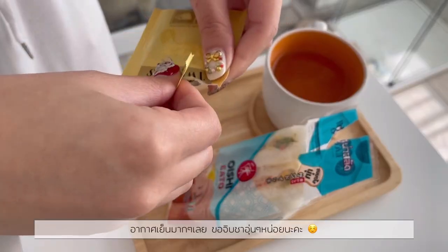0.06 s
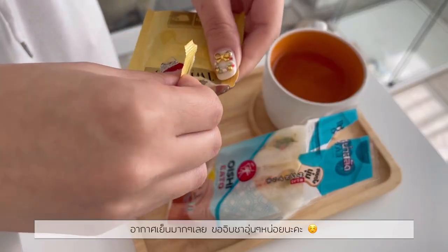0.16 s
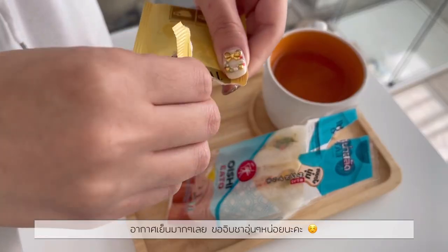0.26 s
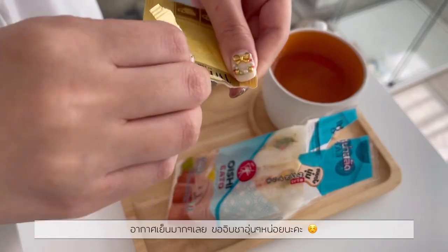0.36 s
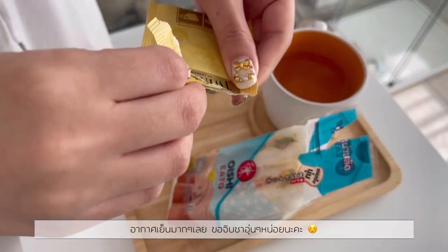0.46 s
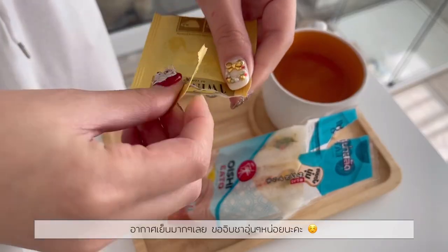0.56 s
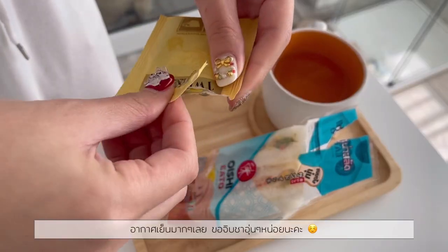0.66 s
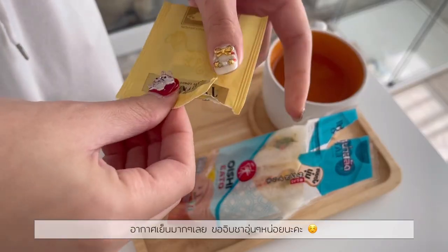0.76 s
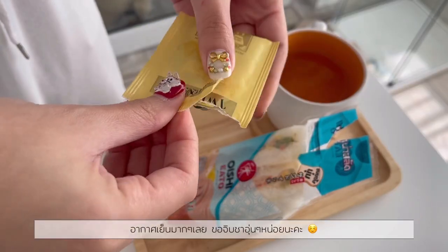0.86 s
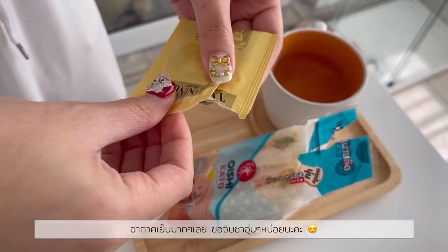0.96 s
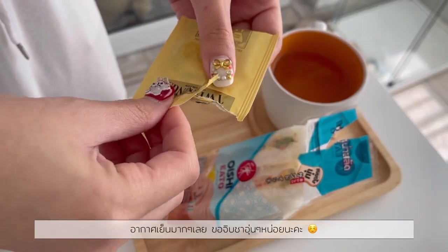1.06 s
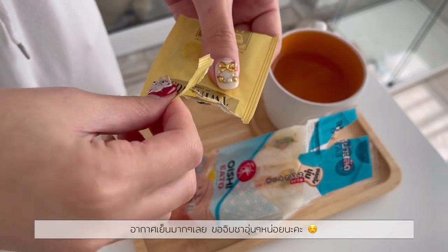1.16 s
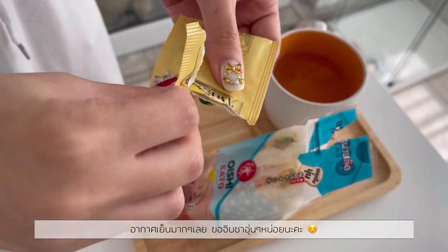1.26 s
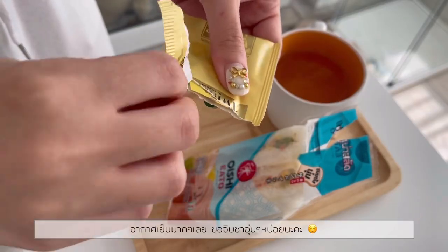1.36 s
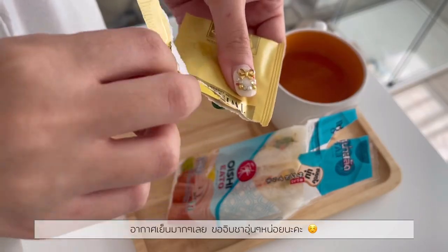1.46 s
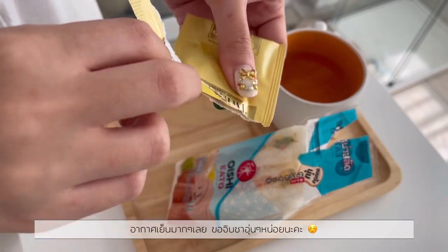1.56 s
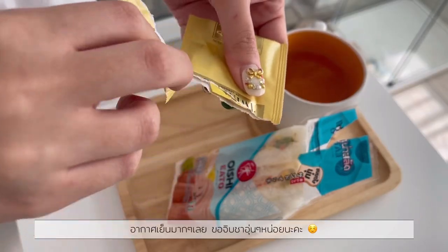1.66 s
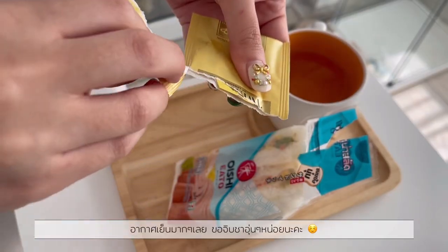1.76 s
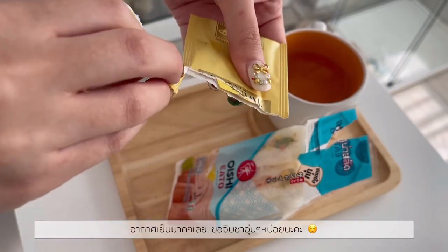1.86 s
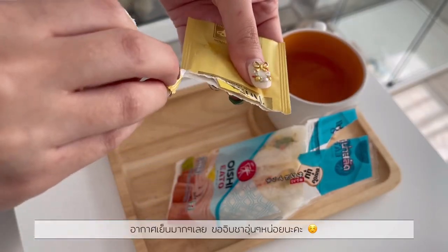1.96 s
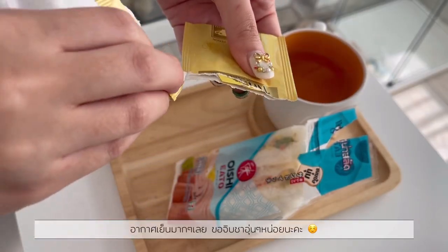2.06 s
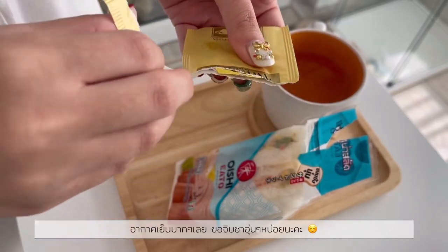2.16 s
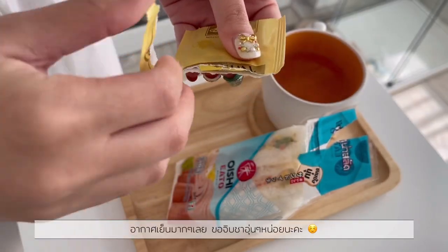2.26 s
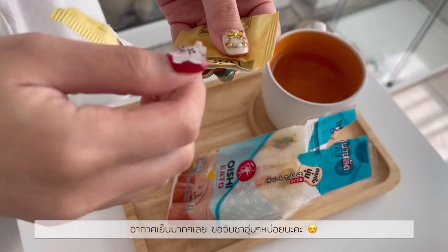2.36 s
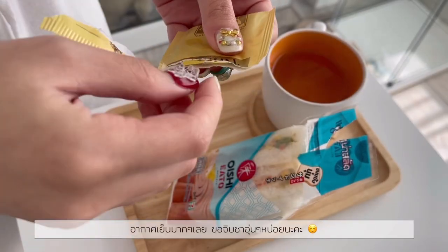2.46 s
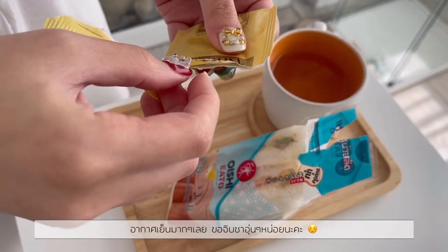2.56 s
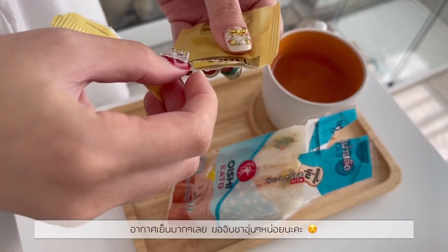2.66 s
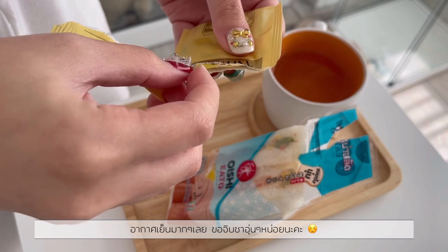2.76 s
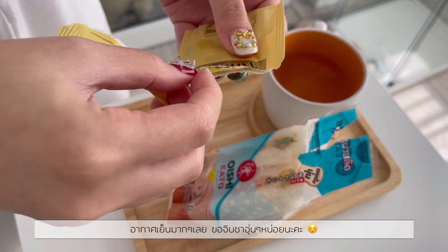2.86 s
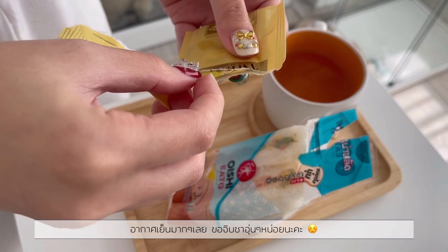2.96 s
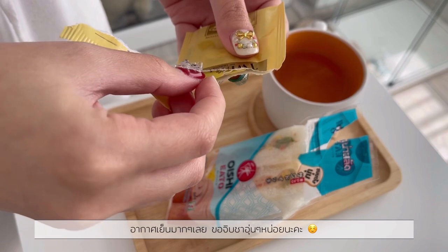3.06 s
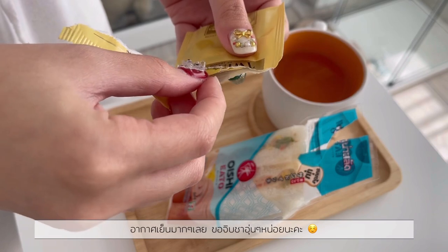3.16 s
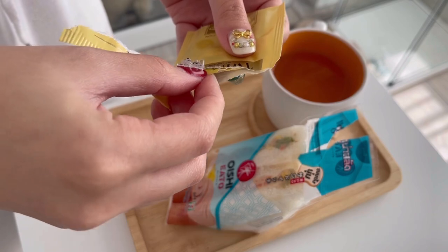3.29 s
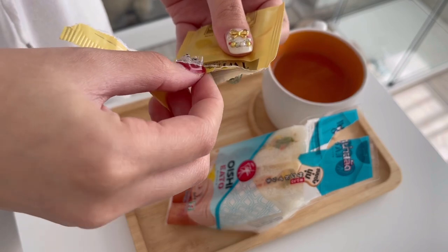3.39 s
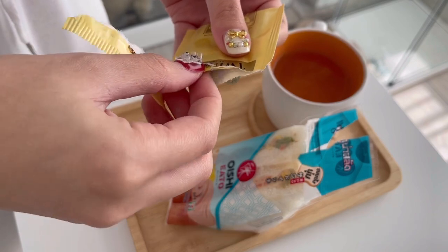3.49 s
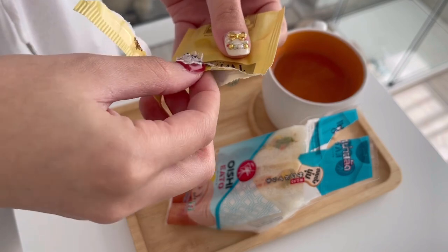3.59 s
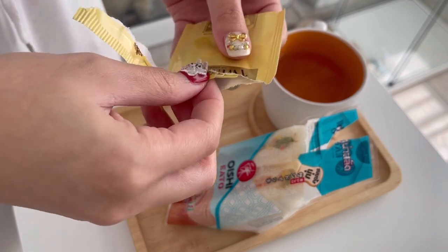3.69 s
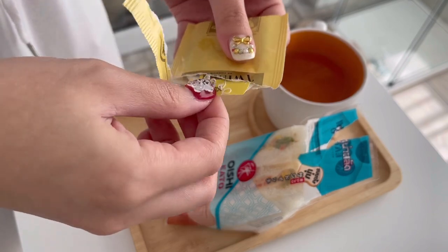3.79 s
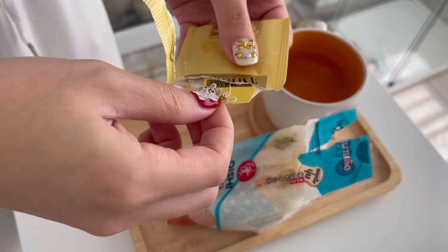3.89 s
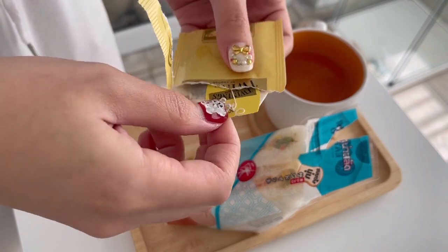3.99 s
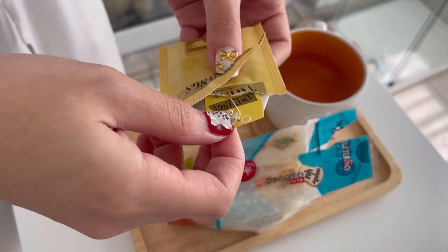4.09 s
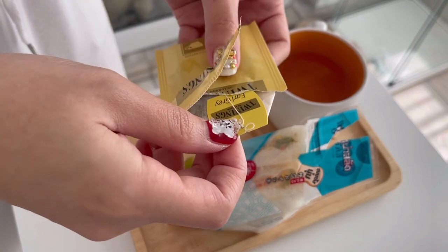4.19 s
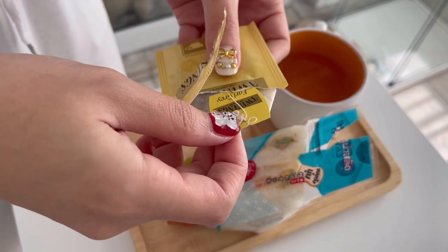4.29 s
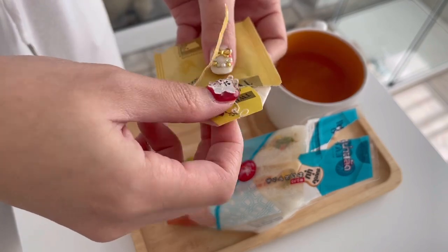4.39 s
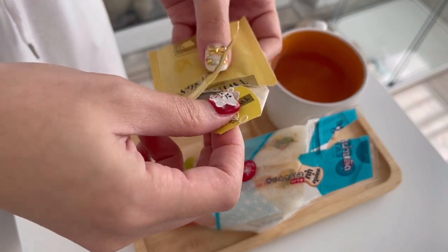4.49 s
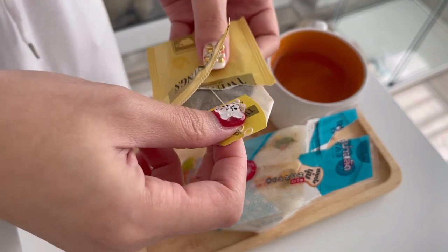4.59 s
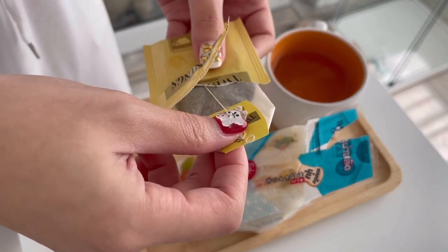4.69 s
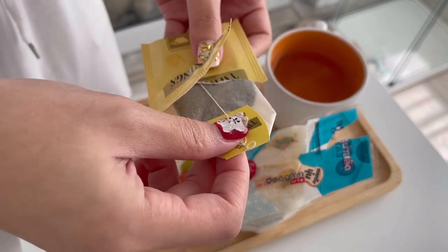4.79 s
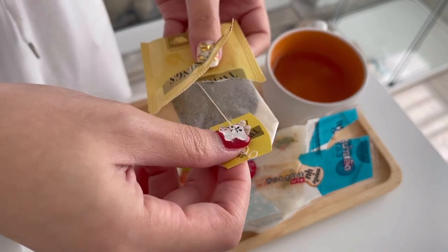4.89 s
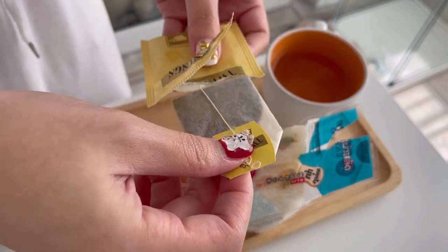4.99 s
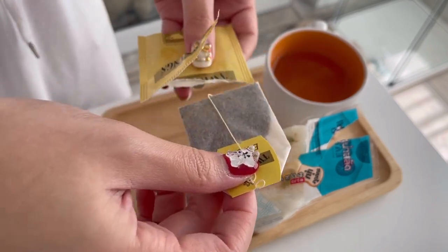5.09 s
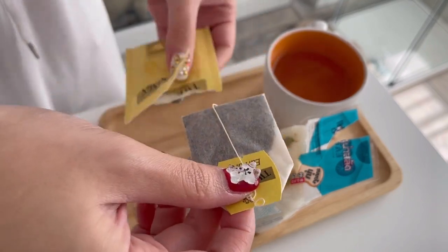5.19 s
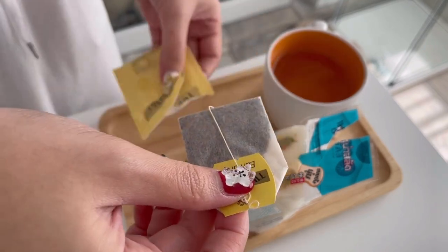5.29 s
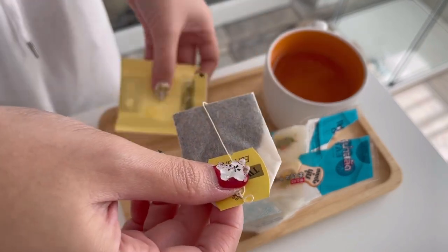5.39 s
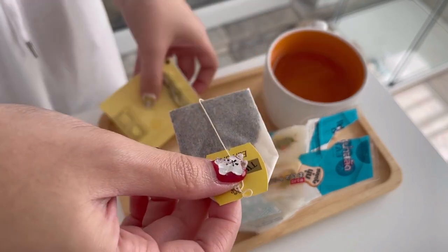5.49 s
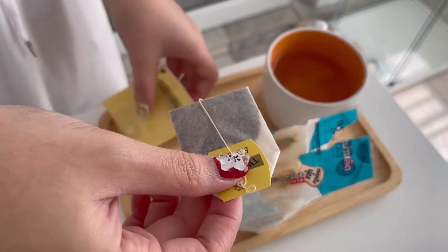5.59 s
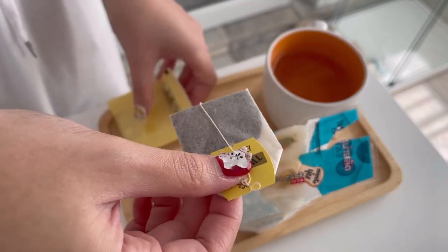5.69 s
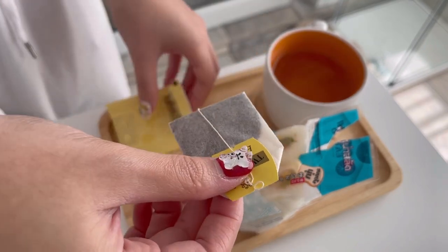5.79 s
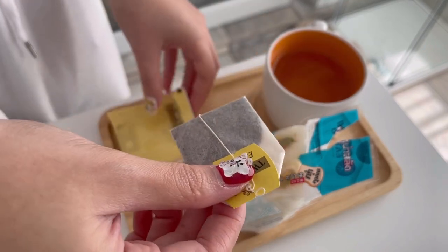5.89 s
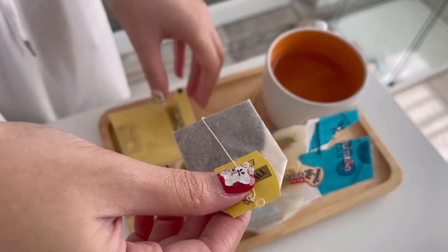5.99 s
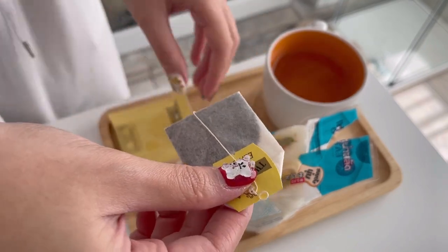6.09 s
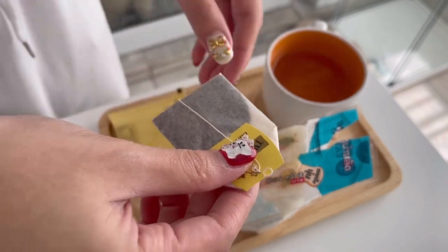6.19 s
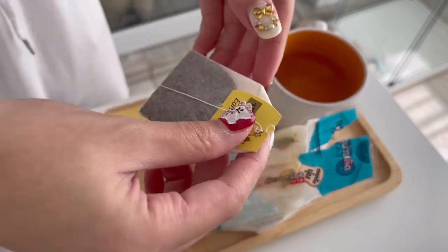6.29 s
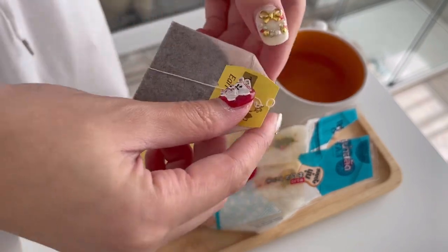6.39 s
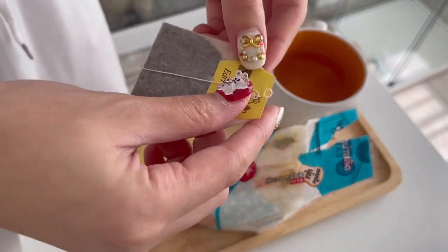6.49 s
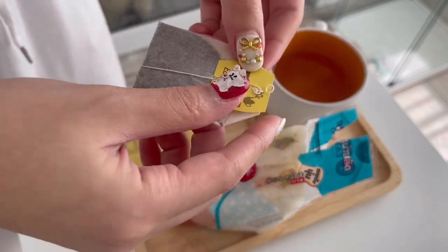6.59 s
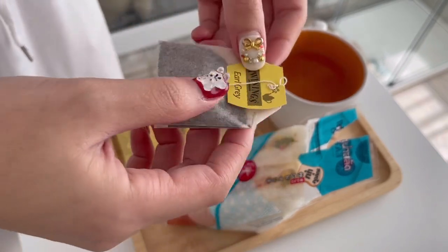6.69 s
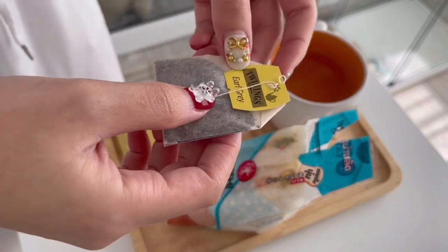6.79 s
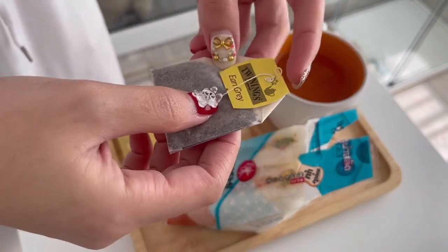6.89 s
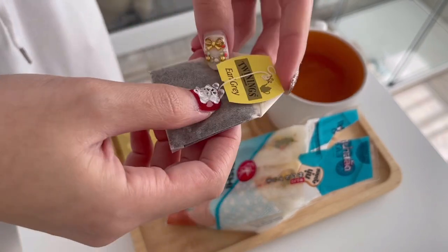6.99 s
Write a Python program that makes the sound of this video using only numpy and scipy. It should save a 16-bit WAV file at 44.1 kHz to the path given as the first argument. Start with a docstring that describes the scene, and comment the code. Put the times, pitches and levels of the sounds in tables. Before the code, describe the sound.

Close to the microphone, fingers tear and crinkle a paper tea-bag sachet over a wooden tray. Crisp snaps and hissy rips come thickly at first, thin out, then return as the tea bag slides out with a papery rub. A few dull thuds come through the table as the wrapper is set down, and the handling ends in faint rustles. A quiet room hums steadily behind it.

```python
"""A humming room, close to a two-port phone microphone: fingers tear, rub and crinkle a paper sachet
over a wooden tray. Slipping fibres hiss and crackle, creases buckle with a snap that the tray reflects,
and the paper resonates in grainy bands. Dull thuds and a low shaking come through the table.
Far off, an insect chirps twice."""
import sys
import numpy as np
from scipy import signal
from scipy.fft import rfft, irfft, next_fast_len
from scipy.io import wavfile
from scipy.ndimage import uniform_filter1d

SR = 44100
rng = np.random.default_rng(int(sys.argv[2]) if len(sys.argv) > 2 else 0)


def transcribe(signal):
    """Save signal, clipped to [-1, 1], as a 16-bit WAV file at the path in sys.argv[1]."""
    frames = np.atleast_2d(signal).T
    limited = np.clip(frames, -1, 1)
    pcm = np.round(limited * 32767).astype(np.int16)
    wavfile.write(sys.argv[1], SR, pcm)


N = 310905

# room air spectrum (frequency [Hz], relative level [dB])
AIR_SPECTRUM = [(18, -13), (30, -15.5), (71, -3), (145, -5), (202, -1), (319, -4), (432, -12), (756, -17),
                (858, -20), (1160, -23), (4360, -51.5), (7820, -49), (11200, -49.5), (13000, -71.5)]
# left-right likeness of the air (frequency [Hz], correlation [-], sign ignored)
AIR_COHERENCE = [(60, -0.4), (180, 1), (550, 0.31), (1650, 0.42), (4970, 0.66), (15000, -0.41)]
# hum bands (centre [Hz], width [Hz], level [dB])
HUM_BANDS = [(192, 6.8, -58), (270, 13, -65.5), (311.3, 7.3, -65)]
# slow level of the table's shaking (time [s], level [dB])
SHAKE_LEVEL = [(0, -47), (.24, -39.5), (.3, -50.5), (.78, -44.5), (.9, -56.5), (1.22, -59), (1.3, -42.5),
               (1.7, -49.5), (1.8, -60.5), (2.65, -60), (2.9, -50), (3.6, -52), (4.4, -74), (4.7, -44.5),
               (5.05, -51.5), (5.45, -60.5), (5.55, -32.5), (5.9, -48), (6.05, -52), (6.25, -43.5),
               (7.05, -44)]
# spectrum of the shaking (frequency [Hz], relative level [dB])
SHAKE_SPECTRUM = [(15, -49.5), (28, -33), (38, -6.5), (48, 2), (65, 1.5), (108, -5.5), (156, -12.5),
                  (296, -26), (400, -32.5), (520, -42), (880, -120)]
# thuds through the table (time [s], level [dB], pitch [Hz])
THUDS = [(0.0, -22, 101), (0.78, -18.5, 83.3), (0.826, -33, 80), (1.37, -26, 67.2), (1.448, -18.5, 103.5),
         (1.461, -21.5, 152.8), (1.466, -29.5, 201), (1.593, -22, 84.3), (1.69, -36, 94.7),
         (1.95, -39, 55.3), (2.002, -31.5, 198), (2.16, -41, 70.2), (2.974, -30.5, 116.8),
         (3.096, -20.5, 100.8), (3.432, -33.5, 117.6), (3.877, -28.5, 101.4), (4.706, -26.5, 58),
         (4.76, -29, 80), (4.811, -26.5, 69.2), (5.192, -33.5, 68.2), (5.503, -17, 85.5),
         (5.541, -26.5, 68.2), (5.577, -17.5, 57.4), (5.72, -33.5, 72.9), (5.879, -29, 70.6),
         (6.322, -23, 72.5), (6.545, -23.5, 64.1), (6.593, -30, 90), (6.618, -25.5, 93.6),
         (6.715, -39, 65.9)]
# finger strokes (start [s], length [s], first [dB], last [dB], relative body [dB], crackle share [0-1])
STROKES = [(0.0, 0.059, -49, -59, -4.5, 0), (0.102, 0.11, -48.5, -46, -15, 0.7),
           (0.254, 0.12, -36.5, -38, -14.5, 0.25), (0.507, 0.057, -49, -60, -3.5, 0.6),
           (0.584, 0.15, -73, -53.5, -3.5, 0.76), (0.826, 0.13, -65, -52.5, -7.5, 0.4),
           (1.172, 0.088, -59, -50, -16, 0.5), (1.279, 0.175, -44, -35.5, -12.5, 0.14),
           (1.527, 0.056, -46, -38, -15, 0.35), (1.613, 0.045, -38.5, -32, -13.5, 0),
           (1.66, 0.03, -35, -40.5, -12, 0.3), (1.782, 0.1, -54.5, -46, -12, 0.7),
           (2.111, 0.23, -58.5, -63.5, -7.5, 0.34), (2.527, 0.083, -71.5, -60.5, -7.5, 0.64),
           (3.13, 0.18, -78, -80, -7, 0.35), (3.381, 0.11, -65.5, -50, -9, 0.4),
           (3.666, 0.096, -53, -37.5, -18.5, 0.2), (3.773, 0.18, -47, -46, -14.5, 0.1),
           (3.955, 0.1, -55, -52, -13.5, 0.4), (4.095, 0.065, -43, -42.5, -17, 0.2),
           (4.27, 0.15, -62.5, -63.5, -6.5, 0.57), (4.458, 0.135, -42, -42, -19.5, .1),
           (4.609, 0.26, -42, -49.5, -19, 0.05), (4.855, 0.15, -53.5, -52.5, -11, 0.1),
           (5.232, 0.044, -59, -64.5, -3, 0.7), (5.357, 0.053, -67, -55, -10.5, 0.4),
           (5.498, 0.18, -75, -60, -9.5, 0.2), (5.66, .06, -70, -66, 2, .3),
           (5.737, 0.14, -50, -62, -4, 0.5), (5.915, 0.02, -49.5, -54, 0, 0.68),
           (6.211, 0.31, -90, -83.5, 8.5, 0.6), (6.697, 0.11, -79, -62, -1.5, 0.5),
           (6.784, 0.41, -75, -67, 0, 0.34)]
# fingertip brushes (start [s], length [s], level [dB], relative body [dB])
BRUSHES = [(0.584, .012, -47, -9), (2.869, 0.015, -60.5, -11.5), (3.024, 0.021, -68.5, -7),
           (3.458, 0.0073, -38.5, -13.5), (5.177, 0.011, -55, -14), (5.515, 0.01, -50, -25),
           (5.544, 0.027, -51, -17), (6.327, .012, -54.5, -2.5)]
# paper treble (frequency [Hz], relative level [dB])
CRACK_SPECTRUM = [(3000, -20), (4100, -11), (5900, -8), (6900, -7.5), (7600, -1.5), (8800, -0.5),
                  (9600, 3.5), (10400, -1.5), (11100, 2), (11800, -9), (12500, -14.5), (13200, -21.5),
                  (14000, -26.5), (15500, -32.5)]
# flexing sheet (frequency [Hz], relative level [dB])
BODY_SPECTRUM = [(300, 2.5), (600, 0.5), (900, 0), (1500, 0), (2800, -1), (3600, -7), (5000, -14)]
# off-centre rustle, before stereo width (frequency [Hz], left-right [dB])
RUSTLE_PAN = [(60, 4.5), (150, -2.5), (380, 2), (950, 1.5), (2380, 4), (5300, 5), (6200, 0.5),
              (15000, -0.5)]
# top treble, dulling as the sachet turns and is laid down (time [s], gain [dB])
TREBLE_GAIN = [(0, -1.5), (.3, -1.4), (.9, -2), (1.3, 4.5), (1.53, 5), (1.7, 0.5), (2.2, 3), (2.7, -10),
               (3.1, -3), (3.5, -0.5), (4.2, -2.1), (4.9, -3), (5.25, 0), (5.45, -5.5), (5.9, -7),
               (6.3, -4), (7.05, -2)]
# room decay (frequency [Hz], T60 [s])
ROOM_T60 = [(800, 0.31), (3000, 0.35), (9000, 0.29), (14000, 0.15)]
# creases, before stereo width (time [s], level [dB], relative body [dB], ring [Hz], left-right [dB])
SNAPS = [(0.0925, -31.5, -13, 3440, 5), (0.2543, -35, -10, 3005, 2.5), (.289, -26, -8, 1983, 4),
         (0.3135, -23, -22, 3004, -2), (0.3596, -21, -21, 3120, 9), (0.371, -23, -16, 2440, 3),
         (.396, -20, -17, 3430, 5), (.462, -45, 5, 1980, 3), (.4635, -56, 10, 800, 3),
         (0.484, -35, -5, 2200, 4.5), (0.4994, -21.5, -6.5, 1380, 4), (0.524, -36.5, -11, 1990, 2.5),
         (.59, -48, 3, 2600, 4), (0.6176, -39.5, -6, 3390, 2), (0.63, -54, 3, 1500, 4),
         (0.6401, -16.5, -10, 1671, 5), (0.893, -51, 4.5, 2280, 9), (0.966, -28, -28, 2595, 6.5),
         (0.9997, -9.5, -22, 3340, 5.5), (1.009, -33, -15.5, 3010, 3), (1.019, -34, -4.5, 2200, 4.5),
         (1.036, -44, 1, 1500, 4), (1.0499, -12.5, -13, 2370, -2), (1.0567, -17.5, -9.5, 2520, 9),
         (1.105, -30, -13, 2620, 4), (1.171, -38.5, -5, 3200, 5), (1.199, -34.5, -12.5, 3220, 2.5),
         (1.214, -36, -23.5, 1200, 2), (1.223, -30, -14, 2790, 5.5), (1.2739, -21, -19, 1590, 3),
         (1.3, -28, -9, 3500, 4), (1.316, -26, -5, 3800, 4), (1.3214, -12.5, -18.5, 3150, 8),
         (1.375, -30, -12, 4800, 3), (1.397, -30, -11, 2700, 2.5), (1.411, -27, -8, 4100, 5),
         (1.448, -20, -13, 1990, 3), (1.466, -19, -11, 2800, 7), (1.4675, -40, 10, 450, 3),
         (1.503, -30, -24, 2410, 7.5), (1.5285, -30, -20, 2500, 4), (1.557, -27, -22, 3017, 2),
         (1.581, -27, -11, 3000, 4), (1.611, -29, -11, 2020, -1), (1.633, -19.5, -15, 2250, 0),
         (1.697, -27, -9, 4500, 10), (1.717, -28, -22, 2480, 6), (1.801, -42, -23.5, 3000, 4),
         (1.8212, -37, -25, 1350, 12), (1.848, -28, -24, 1242, 6.5), (1.8726, -26.5, -27, 2570, 11.5),
         (1.887, -32, -25, 2504, 3.5), (1.9, -25, -23.5, 2490, 5), (1.915, -27, -22, 2503, 0.5),
         (2.1262, -35.5, -6.5, 2500, 4.5), (2.28, -41, -5, 2830, 5.5), (2.3335, -46, 1, 1000, 3),
         (2.384, -19, -14.5, 3830, 4), (2.476, -51, -24, 2980, 4), (2.564, -64, -14, 3000, 2),
         (2.5813, -45.5, -5.5, 1176, -0.5), (2.6525, -28.5, -9.5, 3970, 3), (2.9849, -47.5, -12.5, 1182, 4),
         (3.0857, -24, -11, 3200, 5.5), (3.087, -50, 10, 750, 4), (3.3794, -43, -24, 2340, -1),
         (3.499, -21, -27, 2727, 3), (3.6245, -41.5, -16, 1050, 5), (3.934, -12, -20, 2600, 2.5),
         (3.9355, -44, 8, 900, 3), (4.047, -43, -2, 4000, 4), (4.1005, -29.5, -7, 1402, 3),
         (4.351, -62, -12, 1170, 3), (4.3973, -35, -11.5, 2300, 4), (4.452, -41, -6, 2705, 2),
         (4.5708, -34, -4, 3600, 6), (4.572, -46, 6, 1200, 5), (4.8171, -13.5, -12.5, 2050, 4),
         (4.8258, -22.5, -7.5, 2600, 3.5), (4.9796, -48, 8, 1930, 5), (5.008, -42, -4.5, 2800, 2),
         (5.017, -44, -10, 2850, 4), (5.043, -55, 8, 1290, 3), (5.1403, -66, 3, 3970, 4.5),
         (5.2253, -36.5, 0.5, 4400, 5.5), (5.2265, -56, 10, 1400, 5), (5.283, -61, 10, 2510, 3.5),
         (5.42, -60, -2, 4030, 2), (5.4555, -55, -9.5, 4000, 2), (5.4835, -49, -9, 2930, 5),
         (5.635, -33, -12, 1260, 1.5), (5.654, -46, 2, 3000, 6), (5.7332, -17.5, -9, 2900, 6),
         (5.734, -27, -9, 1085, 2.5), (5.831, -46, 0, 2800, 4), (5.854, -50, 0, 2800, 6),
         (5.879, -48, 2, 2800, 5.5), (5.908, -25.5, -8.5, 3300, 8.5), (5.9095, -44, 8, 1300, 6),
         (5.935, -43.5, -9.5, 3360, 2.5), (5.945, -36, -5.5, 3040, 10), (6.19, -63.5, -5, 4200, 4),
         (6.269, -70, 7.5, 3500, 5.5), (6.318, -57, -1, 3500, 2.5), (6.3664, -37, -24.5, 1103, 6),
         (6.4753, -58.5, -3, 3800, 5), (6.4937, -62, 3, 2500, 2), (6.507, -62.5, -2, 3500, 1),
         (6.7721, -54.5, 0, 3040, 3), (6.784, -48, -6, 3000, 6), (6.8042, -51, -8, 2422, 1),
         (6.824, -44, -7, 3040, 6), (6.8748, -61, -11, 2500, 2), (6.9617, -39, -6, 2350, 6),
         (7.041, -52, 0, 2500, 5)]
# resonant bands of the paper (start [s], length [s], centre [Hz], width [Hz], level [dB])
PAPER_BANDS = [(.252, .15, 1300, 1500, -54), (0.661, 0.028, 1570, 400, -55.5),
               (1.292, 0.061, 2600, 1500, -49), (1.331, 0.15, 3890, 1200, -48.5),
               (1.555, .045, 900, 700, -56), (1.655, .055, 700, 700, -52),
               (1.619, 0.076, 3950, 1200, -53.5), (3.694, 0.13, 3250, 2000, -54.5),
               (4.112, 0.088, 2800, 1500, -60.5), (4.451, 0.13, 2580, 1000, -57.5),
               (4.455, .2, 1500, 900, -63), (4.469, 0.32, 5300, 900, -57.5), (4.443, 0.5, 2760, 600, -68.5),
               (5.224, 0.049, 4640, 1200, -61), (5.626, 0.047, 1260, 400, -59),
               (5.769, 0.038, 2665, 600, -52), (5.845, 0.034, 2740, 900, -60)]
# insect chirps (start [s], length [s], centre [Hz], level [dB])
CHIRPS = [(3.175, 0.18, 6200, -79.5), (6.126, 0.17, 6200, -79.5)]
# phase between the microphone ports (frequency [Hz], left lead [rad])
PORT_PHASE = [(0, -1), (950, 0.68), (2700, 0.95), (3400, .55), (5500, .05), (6700, .05), (7500, .7),
              (8200, .45), (8900, -.8), (9600, -2.4), (10300, -3.2), (11000, -4.4), (11700, -5.7),
              (12400, -6.4), (13000, -7.6), (13700, -9.4), (14400, -12), (15100, -12.5), (16500, -12.5)]


def gain_of(db):
    return 10 ** (np.asarray(db) / 20)


def pan_gains(pan_db):
    return gain_of(np.outer([.5, -.5], pan_db))


def unit_rms(x):
    return x / np.sqrt(np.mean(x ** 2) + 1e-20)


def at_hz(points, hz):
    f, value = np.transpose(points)
    return np.interp(np.log(hz + 1), np.log(f + 1), value)


def over_time(points):
    return np.interp(np.arange(N) / SR, *np.transpose(points))


def flutter(depth_db, span_samples, count=N):
    """Smooth random gain."""
    return gain_of(depth_db * unit_rms(uniform_filter1d(rng.standard_normal(count), span_samples)))


def shaped(x, gain):
    """Apply gain(hz) to the whole signal."""
    size = next_fast_len(N + 4096)
    return irfft(rfft(x, size) * gain(np.fft.rfftfreq(size, 1 / SR)), size)[..., :N]


def impulse_response(spectrum):
    """Causal unit-energy filter with this spectrum."""
    hz = abs(np.fft.fftfreq(4096, 1 / SR))
    inside = (hz > spectrum[0][0] * .7) & (hz < spectrum[-1][0] * 1.5)
    log_gain = np.log(gain_of(np.where(inside, at_hz(spectrum, hz), -60)))
    taps = np.fft.ifft(np.exp(np.conj(signal.hilbert(log_gain)))).real[:1024]
    return taps / np.linalg.norm(taps)


def noise_pair(correlation):
    a, b = rng.standard_normal((2, N))
    return np.array([a, correlation * a + np.sqrt(1 - correlation ** 2) * b])


def flattened(burst, share=0.44):
    """Even out a burst's chance spectral peaks."""
    spectrum = rfft(burst)
    return irfft(spectrum / (abs(spectrum) + 1e-9) ** share, len(burst))


def swell(start_s, length_s, hz, width_hz, db, taper=0.85, grain_db=0.0):
    """Resonant noise band that swells and fades."""
    out, at, count = np.zeros(N), round(start_s * SR), round(length_s * SR)
    radius = np.exp(-np.pi * width_hz / SR)
    resonator = [1, 0, -1, 1, -2 * radius * np.cos(2 * np.pi * hz / SR), radius ** 2]
    band = signal.sosfilt([resonator, resonator], rng.standard_normal(SR)[:count])
    band *= flutter(grain_db, 60, SR)[:count]
    out[at:at + count] = gain_of(db) * unit_rms(band) * np.sin(np.pi * np.arange(count) / count) ** taper
    return out


def air(level_db=-53):
    """Steady room air, partly alike at both ports."""
    left, other = shaped(rng.standard_normal((2, N)), lambda f: gain_of(at_hz(AIR_SPECTRUM, f)))
    likeness = lambda f: np.clip(abs(at_hz(AIR_COHERENCE, f)), 0, 1)
    right = shaped(left, likeness) + shaped(other, lambda f: np.sqrt(1 - likeness(f) ** 2))
    return gain_of(level_db) * unit_rms(np.array([left, right]))


def hum():
    """Room hum: noise bands so narrow that they waver."""
    out = np.zeros(N)
    for hz, width_hz, db in HUM_BANDS:
        band = shaped(rng.standard_normal(N), lambda f: 1 / (1 + (2 * (f - hz) / width_hz) ** 2))
        out += gain_of(db) * unit_rms(band)
    return out


def table_thuds(rise_s=0.0076, t60_s=0.078, knock_ratio=2.4, knock_db=-10.5, knock_t60_s=0.05,
                rumble_db=-6, rumble_t60_s=0.19):
    """Each thud rings a low mode and a shorter upper knock, and swells the table's lumpy shaking."""
    lumps = flutter(1.0, 1500)
    shake = shaped(noise_pair(0.4), lambda f: gain_of(at_hz(SHAKE_SPECTRUM, f)))
    shake /= (uniform_filter1d((shake ** 2).mean(0), size=3000) + 1e-12) ** 0.3  # tame chance swells
    shake_power = gain_of(2 * over_time(SHAKE_LEVEL))
    t, modes = np.arange(SR // 3) / SR, np.zeros(N)
    rise = 1 - np.exp(-t / rise_s)
    for start_s, db, hz in THUDS:
        at = slice(round(start_s * SR), round(start_s * SR) + len(t))
        phase = 2 * np.pi * hz * t
        modes[at] += rise * gain_of(db - 60 * t / t60_s) * np.sin(phase)
        modes[at] += rise * gain_of(db + knock_db - 60 * t / knock_t60_s) * np.sin(knock_ratio * phase)
        shake_power[at] += (rise * gain_of(db + rumble_db - 60 * t / rumble_t60_s)) ** 2
    return unit_rms(shake * lumps) * np.sqrt(shake_power) + modes * np.array([[1.2], [.9]])


def finger_strokes(gentle_attack_db_per_s=598.5, release_db_per_s=349.5, gentle_db=-58):
    """Total, crackle and body power of strokes and brushes; firmer strokes rise faster."""
    t, power = np.arange(N) / SR, np.zeros((3, N))
    for start_s, length_s, first_db, last_db, body_db, share in STROKES:
        held_db = np.interp(t, [start_s, start_s + length_s], [first_db, last_db])
        attack_db_per_s = gentle_attack_db_per_s * (1 + .05 * max(first_db - gentle_db, 0))
        fade_db = attack_db_per_s * np.maximum(start_s - t, 0)
        fade_db += release_db_per_s * np.maximum(t - start_s - length_s, 0)
        envelope = gain_of(np.maximum(held_db - fade_db, -140))
        power += np.outer([1, share, gain_of(2 * body_db)], envelope ** 2)
    for start_s, length_s, db, body_db in BRUSHES:
        n = np.arange(round(length_s * SR))
        envelope = gain_of(db) * np.sin(np.pi * n / len(n))
        power[:, round(start_s * SR) + n] += np.outer([1, 0, gain_of(2 * body_db)], envelope ** 2)
    return power


def rustle(crackles_per_s=1000, spread_db=9.5, grain_ms=0.72, flutter_db=2.0):
    """Fibres slip as a fine hiss; small creases give way as crackles of very uneven size."""
    power, crackle_power, body_power = finger_strokes()
    sizes = gain_of(spread_db * np.minimum(rng.exponential(1, N), 2.55))
    impulses = sizes * (rng.random(N) < crackles_per_s / SR)
    grain = np.exp(-np.arange(300) / (grain_ms * SR / 1000))
    crackle = unit_rms(signal.oaconvolve(impulses, grain)[:N])
    envelope = np.sqrt(abs(power - crackle_power) + crackle_power * crackle ** 2)
    drive = unit_rms(flutter(flutter_db, 500)) * noise_pair(0.84) * envelope
    treble = signal.oaconvolve(drive, impulse_response(CRACK_SPECTRUM)[None])
    body = signal.oaconvolve(drive * np.sqrt(body_power / power), impulse_response(BODY_SPECTRUM)[None])
    return (treble + body)[:, :N]


def bending(x, depth_db=2.3):
    """Resonances shift as the sachet bends: random gain patches of about 700 Hz by 40 ms."""
    spectra = signal.stft(x, nperseg=256, noverlap=192)[2]
    patches = rng.standard_normal(spectra.shape[1:][::-1]).T
    patches = uniform_filter1d(patches, size=4, axis=0)
    patches = unit_rms(uniform_filter1d(patches, size=28, axis=1))
    return signal.istft(spectra * gain_of(depth_db * patches), nperseg=256, noverlap=192)[1][:, :N]


def room(x, build_s=0.0056):
    """Wall reflections: sparse taps of random sign build up, then each band dies at its own rate."""
    slots = np.arange(130, SR // 2 - 20, 20)
    taps = np.zeros((2, SR // 2))
    at = slots + rng.integers(0, 20, (2, len(slots)))
    np.put_along_axis(taps, at, rng.choice([-1., 1.], at.shape), 1)
    taps[1] = 0.46 * taps[0] + 0.77 * taps[1]
    taps *= 1 - np.exp(-np.arange(SR // 2) / (build_s * SR))
    hz, t, spectra = signal.stft(taps, SR, nperseg=128)
    decay = gain_of(-60 * t / at_hz(ROOM_T60, hz)[:, None])
    tail = signal.istft(spectra * decay, SR, nperseg=128)[1]
    return signal.fftconvolve(x.mean(0)[None], tail / np.linalg.norm(tail[0]), axes=1)[:, :N]


def snaps(burst_ms=1.3, ring_width_hz=1500, thump_db=-7, echo_ms=1.195, echo_db=-8):
    """Creases buckle, the sheet thumps and rings, the tray echoes. Returns direct and wall-bound sound."""
    direct, to_walls = np.zeros((2, 2, N + 4096))
    treble, sheet = impulse_response(CRACK_SPECTRUM), impulse_response(BODY_SPECTRUM)
    count = 600
    t = np.arange(count) / SR
    age = t / (burst_ms / 1000)
    for start_s, db, body_db, ring_hz, pan_db in SNAPS:
        burst = rng.standard_normal(count)
        crack = np.convolve(flattened(burst * age * np.exp(-3 * age)), treble)[:count]
        crack /= abs(crack).max()
        mode = np.exp(-np.pi * ring_width_hz * t) * np.sin(2 * np.pi * ring_hz * t)
        ring = np.diff(np.convolve(mode, mode))[:count]
        response = ring / np.linalg.norm(ring) + gain_of(thump_db) * sheet[:count]
        body = np.convolve(flattened(burst[::-1] * age * np.exp(-2 * age)), response)[:count]
        body *= gain_of(body_db) / abs(body).max()
        at = round(start_s * SR)
        direct[:, at:at + count] += gain_of(db) * pan_gains(pan_db) * (crack + body)
        # same energy, ring blurred over all directions
        blurred = np.linalg.norm(crack) * treble + np.linalg.norm(body) * sheet
        to_walls[:, at:at + len(blurred)] += gain_of(db) * blurred
    delay = round(echo_ms * SR / 1000)
    direct[:, delay:] += gain_of(echo_db) * direct[:, :-delay]
    return direct[:, :N], to_walls[:, :N]


def paper_resonances(pan_db=4):
    """Grainy resonant bands of the paper as it is torn, rubbed and scraped, a little to the left."""
    return sum(swell(*row, taper=0.68, grain_db=2.5) for row in PAPER_BANDS) * pan_gains(pan_db)


def insect(width_hz=450):
    """Short, faint, fuzzy chirps."""
    return sum(swell(start_s, length_s, hz, width_hz, db) for start_s, length_s, hz, db in CHIRPS)


def scene(treble_hz=7350, narrow_above_hz=5800):
    """Paper and its reflections, over table, room air, hum and insect."""
    top_band = lambda f: 1 - 1 / (1 + (f / treble_hz) ** 12)
    stereo_width = lambda f: .45 + 0.7 / (1 + (f / narrow_above_hz) ** 16)
    rub = bending(rustle())
    cracks, to_walls = snaps()
    to_walls = shaped(to_walls, lambda f: 1 - .35 * top_band(f))
    paper = shaped(rub, lambda f: pan_gains(at_hz(RUSTLE_PAN, f))) + cracks
    paper += room(gain_of(-10.5) * to_walls + gain_of(-10) * rub)
    middle = paper.mean(0)
    paper = middle + shaped(paper - middle, stereo_width)
    paper += (gain_of(over_time(TREBLE_GAIN)) - 1) * shaped(paper, top_band)
    return paper + paper_resonances() + table_thuds() + air() + hum() + insect()


def record(dry, cutoff_hz=16400):
    """Phase difference between the two ports, then the band limit."""
    ported = shaped(dry, lambda f: np.exp(1j * np.outer([.5, -.5], at_hz(PORT_PHASE, f))))
    lowpass = signal.firwin(511, cutoff_hz, window=("kaiser", 9), fs=SR)
    return signal.oaconvolve(ported, lowpass[None], "same")


dry = scene()
out = record(dry)
transcribe(out)
```